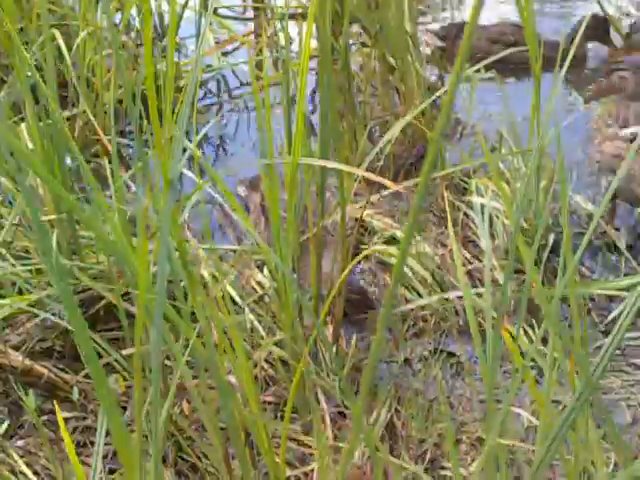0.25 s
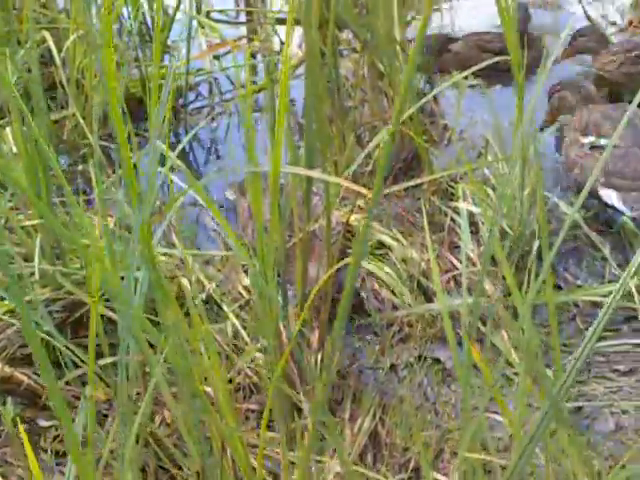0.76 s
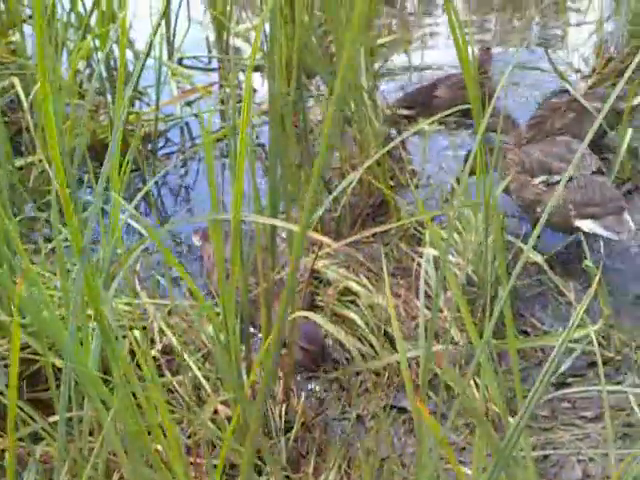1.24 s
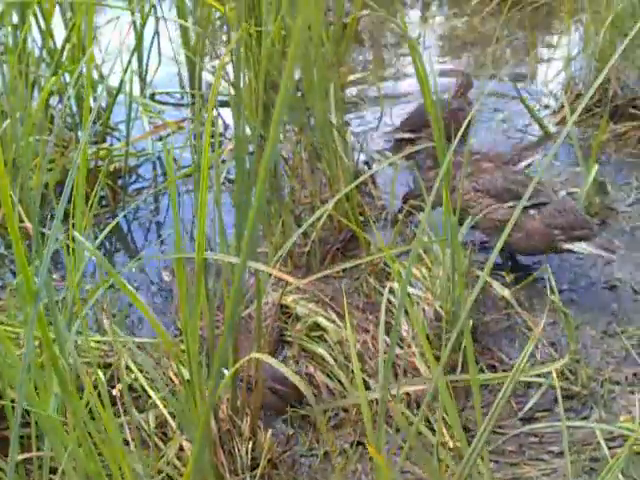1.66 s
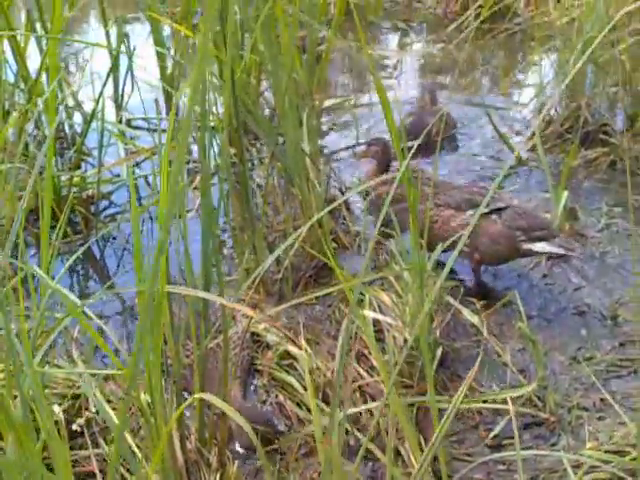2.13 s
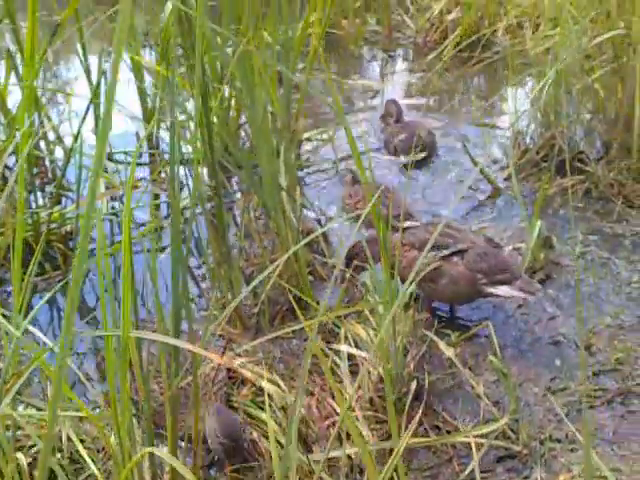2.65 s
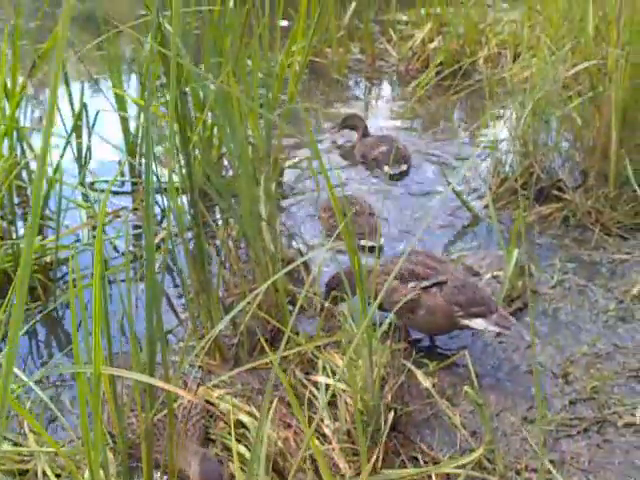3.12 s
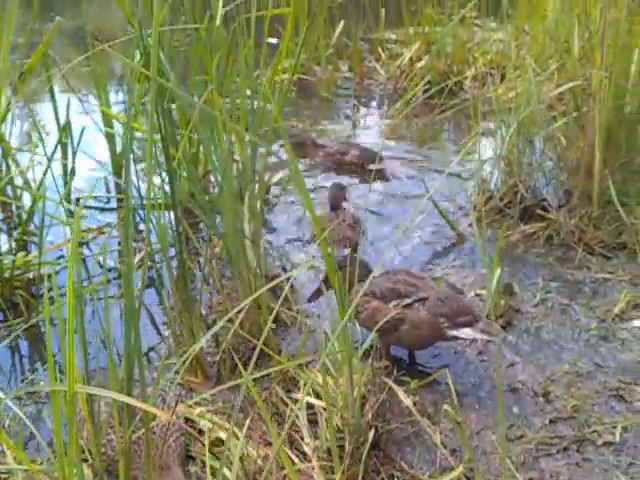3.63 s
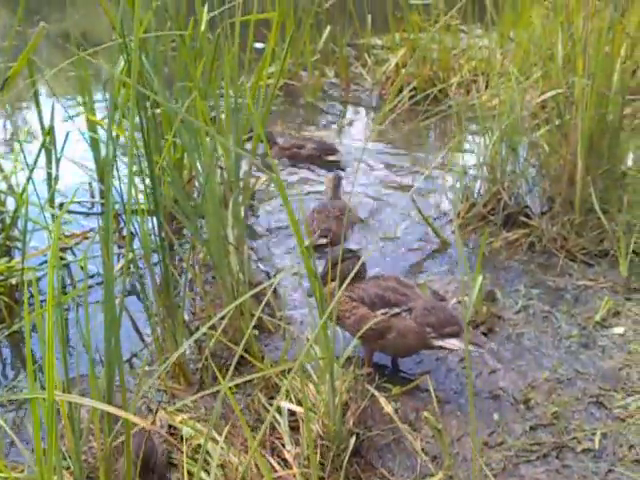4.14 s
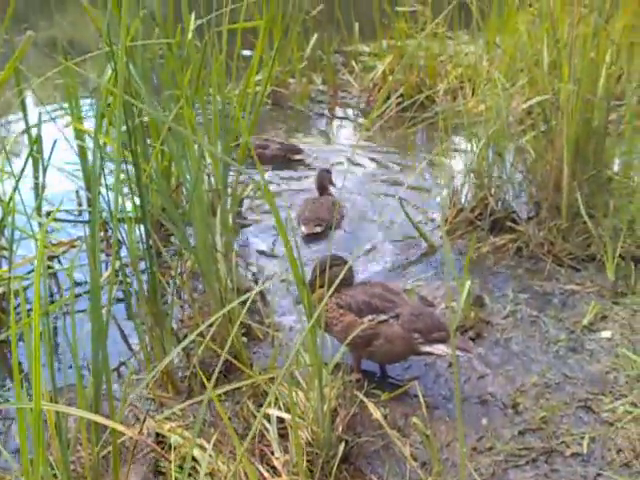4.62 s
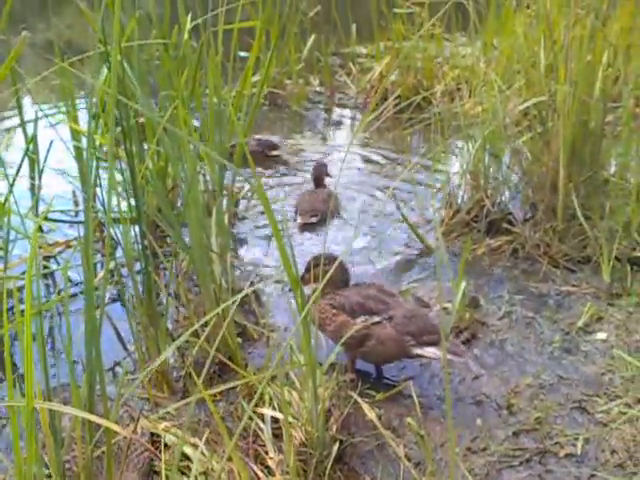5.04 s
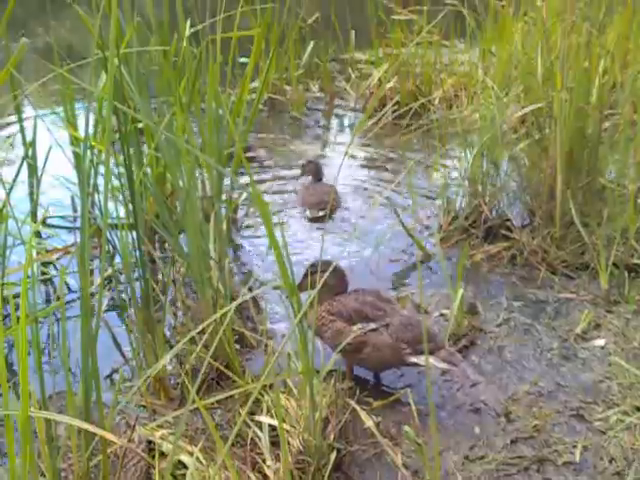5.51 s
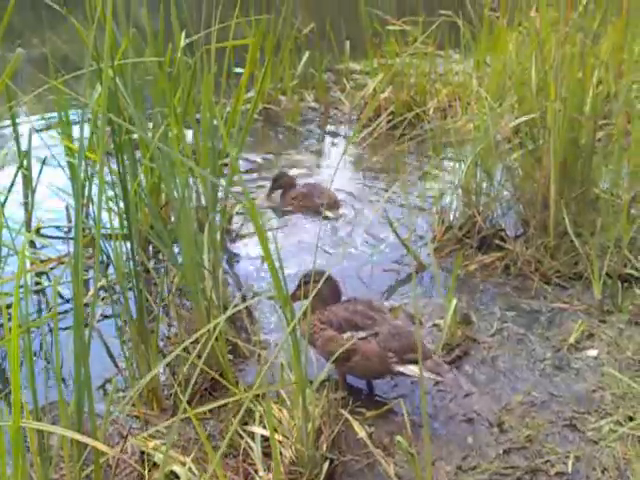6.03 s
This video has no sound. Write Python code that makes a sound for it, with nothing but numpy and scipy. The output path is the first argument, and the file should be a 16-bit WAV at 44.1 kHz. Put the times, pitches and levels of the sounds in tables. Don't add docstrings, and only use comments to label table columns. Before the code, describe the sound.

Duck bills click, nibble and snap in muddy shallows, with watery plops, tiny bubbles, faint young peeps and low wind rumble over soft hiss.

```python
import sys
import numpy as np
from scipy import signal
from scipy.fft import rfft, irfft
from scipy.io import wavfile
from scipy.ndimage import uniform_filter1d

SR = 44100
rng = np.random.default_rng(int(sys.argv[2]) if len(sys.argv) > 2 else 0)


def master(y):
    cut = np.clip(np.atleast_2d(y).T, -1, 1)
    pcm = np.round(cut * 32767)
    wavfile.write(sys.argv[1], SR, pcm.astype(np.int16))


def linear_from_db(decibels):
    return 10 ** (np.asarray(decibels, float) / 20)


N = 276507

# f/Hz, level/dB per Hz
HISS_COLOUR = [(20, -17.5), (60, -9), (130, -9), (270, -16), (550, -21.5), (1000, -20.5), (2000, -23),
               (3900, -24.5), (4700, -29), (8400, -29), (11000, -28.5), (14000, -21.5), (15500, -24)]
# f/Hz, level/dB
BUZZ_COLOUR = [(200, -77), (600, -77.5), (1400, -77), (2400, -84), (3000, -75)]
# f/Hz, level/dB
WHINE = (3999.8, -76)
# t/s, level/dB
GUSTS = [(.11, -38.5), (.41, -52), (.54, -50), (.81, -58), (1.13, -43), (1.33, -56), (1.69, -48),
         (1.99, -51), (2.109, -41.5), (2.21, -45.5), (2.37, -46), (2.84, -48.5), (2.94, -49.5), (3.08, -49),
         (3.19, -45.5), (3.4, -48), (3.52, -45), (3.62, -46), (3.78, -48), (3.87, -41), (4.01, -48),
         (4.08, -43.5), (4.36, -49), (4.47, -49), (4.7, -55), (4.92, -50), (5.07, -47), (5.32, -42.5),
         (5.63, -53.5), (6.16, -49)]
# t/s, length/s, start f/Hz, level/dB
PEEPS = [(.827, .024, 1980, -61), (1.202, 0.018, 2025, -52), (1.51, 0.016, 1990, -50.5),
         (1.522, .024, 1700, -65), (1.528, 0.043, 1976, -49), (1.747, .024, 1746, -56),
         (1.759, 0.053, 1505, -47), (1.959, 0.017, 2050, -58), (1.98, 0.036, 2010, -55),
         (2.248, .016, 2050, -56), (2.269, .054, 2030, -59), (5.192, .03, 2200, -65),
         (5.453, 0.029, 2240, -59), (5.737, .022, 2300, -57), (6.015, 0.021, 2250, -52),
         (6.056, 0.03, 1970, -55)]
# t/s, length/s, start f/Hz, level/dB
CHEEPS = [
    (.226, 0.031, 2170, -64),
    (1.215, 0.032, 1920, -63),
    (.523, 0.065, 2070, -61),
    (2.872, .016, 1500, -48),
    (5.183, 0.031, 2380, -60),
    (5.463, 0.026, 2460, -53),
    (6.031, 0.027, 2470, -52.5),
]
# t/s, length/s, start f/Hz, level/dB
MURMURS = [
    (1.542, 0.016, 2860, -51),
    (2.855, 0.032, 1060, -51),
    (2.92, 0.028, 1175, -51.5),
    (2.953, 0.051, 1095, -53.5),
    (3.74, 0.025, 1100, -49),
    (3.771, 0.043, 1050, -56.5),
    (3.846, 0.029, 1023, -55.5),
]
# start t/s, length/s, level/dB
DABBLES = [
    (.33, 0.076, -65.5),
    (1.416, 0.25, -63.5),
    (2.02, 0.031, -68),
    (2.78, 0.37, -65),
    (3.35, .16, -62.5),
    (3.52, 0.033, -55),
    (3.745, 0.42, -58),
    (4.528, 0.017, -59.5),
    (4.672, 0.021, -64.5),
]
# f/Hz, level/dB
BUBBLE_COLOUR = [(1600, -4.5), (2600, -0.5), (4100, 0.7), (4800, -4.5), (12000, 0)]
# t/s, peak level/dB, f/Hz, ringing/cycles
PLOPS = [(0.483, -57, 1100, 17), (0.908, -53, 1030, 22), (1.255, -46, 1520, 27), (1.433, -40.5, 1210, 20),
         (1.658, -42, 1120, 16), (1.943, -46, 1250, 22), (1.999, -43.5, 1350, 21), (2.375, -45, 1260, 15),
         (2.402, -32.5, 1730, 18), (2.462, -32, 2050, 11), (2.916, -44, 1250, 20), (3.083, -28, 1750, 21.4),
         (3.197, -53, 1180, 18), (3.211, -47, 1590, 18), (3.565, -49, 1080, 36), (3.63, -44, 980, 15),
         (3.679, -44, 1760, 21), (4.26, -39, 2100, 14.3), (4.527, -41, 2470, 20), (4.54, -50, 2300, 18),
         (4.684, -40.5, 2180, 21), (5.8258, -20, 2380, 26)]
# ring f/Hz, knock level/dB against the ring, touches/count
BILLS = [
    (2730, -11, 2),
    (3170, -2.5, 2),
    (3800, 0, 2),
    (3400, 5, 1),
]
# t/s, ring level/dB
LARGE_BILL = [(.706, -41.5), (1.55, -43), (1.7687, -37), (2.4045, -28), (2.745, -41.5), (2.8048, -45.5),
              (2.8812, -46), (2.9221, -40.5), (3.147, -43.5), (3.227, -45), (3.551, -52), (3.628, -46),
              (3.7866, -43), (3.913, -39), (4.058, -39), (4.107, -35.5), (4.1457, -45), (4.1644, -46)]
# t/s, ring level/dB
MIDDLE_BILL = [(.0118, -48), (0.119, -39), (0.1207, -33.5), (1.167, -46), (1.2559, -44.5), (1.6267, -41),
               (1.644, -37), (1.6576, -39), (1.949, -47), (2.4109, -36.5), (2.986, -34.5), (3.398, -48),
               (3.9764, -45), (5.9696, -46.5)]
# t/s, ring level/dB
SMALL_BILL = [
    (0.1937, -44),
    (1.6827, -43.5),
    (3.567, -46),
    (3.679, -51),
    (4.152, -42.5),
    (4.553, -39),
    (4.556, -47),
    (4.63, -48),
    (4.744, -46),
]
# t/s, ring level/dB
TIP_TAPS = [(.163, -51), (1.148, -55), (1.8308, -44), (1.884, -40), (2.165, -51), (2.7362, -44.5),
            (4.045, -48), (4.26, -32.5), (4.347, -50), (4.5907, -46), (4.6857, -37.5), (6.213, -55)]
# t/s, bill ring f/Hz, ring
# level/dB, crack level/dB
CRACKS = [(.0032, 3100, -47, -37.5), (1.3825, 5790, -45, -42), (1.5077, 5790, -63, -41),
          (1.6173, 3450, -43, -45), (1.619, 3120, -38, -29.5), (1.646, 3180, -44, -37),
          (1.9413, 6100, -28, -31), (2.397, 2970, -39, -37), (2.3992, 2700, -37, -33),
          (2.462, 3470, -40.5, -37), (2.4668, 2300, -41, -41), (2.4926, 4500, -37, -33.5),
          (2.865, 3800, -43, -40), (3.0467, 5790, -42, -41), (3.2125, 3630, -39.5, -34.5),
          (3.476, 5790, -58, -38), (3.5557, 2560, -51, -34.5), (3.6312, 3830, -43.5, -41),
          (3.745, 2820, -37.5, -40), (3.747, 5700, -41, -49), (3.8964, 3400, -46, -39),
          (4.1034, 2980, -36, -34), (4.26, 3480, -40, -44), (4.5241, 3920, -41, -40),
          (4.5272, 4050, -37, -27.5), (4.5386, 3300, -35, -42), (4.5418, 4250, -27, -27),
          (4.55, 3300, -42, -39),
          (3.074, 3680, -47, -38),
    (3.0844, 5200, -24, -28),
    (3.0864, 2300, -47, -40),
    (3.0931, 6500, -36, -22.5),
    (3.0955, 4220, -46, -27),
    (5.835, 2330, -45, -38),
    (5.844, 5710, -42, -47),
]
# t/s, spray level/dB
FLICKS = [(0.09, -44), (.2383, -36.5), (0.725, -42), (.3734, -48), (0.935, -39), (1.3828, -35),
          (1.4522, -45), (1.552, -38), (1.5591, -42), (1.621, -30), (1.6909, -38), (1.8809, -41.5),
          (2.3936, -32), (2.4927, -36), (2.8574, -38), (2.9738, -44), (3.0837, -31), (3.0955, -25),
          (3.539, -37), (3.5557, -36), (4.1055, -36), (4.26, -49), (4.535, -32), (4.558, -36),
          (4.6857, -37), (5.838, -46)]
# t/s, peak level/dB, swell before level/dB, crackle after level/dB, crackle decay/s
HARD_SNAPS = [
    (3.0776, -10.5, -37, -19, 0.0019),
    (4.3406, -9.5, -26, -8, .0016),
    (5.8264, -2, -41, -14, 0.00093),
]
# f/Hz, level/dB per Hz
HARD_COLOURS = [
    [(410, -66), (700, -28), (1610, -28), (3310, -2.5), (4250, 2), (5700, -12), (6680, -3.5), (9560, -6),
     (12600, -25), (14400, -8), (15600, -19), (16700, -44)],
    [(410, -48), (700, -19), (1340, 5), (3220, -1), (5190, 0), (5770, 3), (6590, -3), (7230, 1.5),
     (11700, -11.5), (12800, -9), (15000, -7), (16700, -48)],
    [(410, -66), (700, -35), (1700, -38), (2370, -1), (3580, -12), (4370, 0.5), (5260, -11), (8600, -2.5),
     (9430, -6.5), (12500, -3.5), (16000, -12), (16700, -29.5)],
]


def at_hz(points, hz):
    table = np.array(points)
    return np.interp(np.log(hz), np.log(table[:, 0]), table[:, 1])


def rms_one(x):
    return x / np.sqrt(np.mean(x ** 2) + 1e-20)


def band(x, low_hz, high_hz, order=2):
    edges = [low_hz, min(high_hz, .45 * SR)]
    return signal.sosfilt(signal.butter(order, edges, "band", fs=SR, output="sos"), x)


def steep(x, top_hz):
    return signal.sosfilt(signal.ellip(10, .5, 70, top_hz, fs=SR, output="sos"), x)


def drift(rate):
    r = np.exp(-80 * np.pi * rate / SR)
    white = rng.standard_normal(N // 40 + 2002)
    slow = signal.lfilter([1], [1, -2 * r, r * r], white)[2000:]
    return np.interp(np.arange(N) / 40, np.arange(len(slow)), rms_one(slow))


def add(out, s, sound):
    i = round(s * SR)
    out[i:i + len(sound)] += sound[:N - i]


def hiss():
    out, white = 0, rng.standard_normal((2, N))
    edges = np.geomspace(22, 18000, 21)
    together = drift(2.4)
    for k, (low, high) in enumerate(zip(edges, edges[1:])):
        flicker_db = 0.6 * together + 1.24 * drift(18.0)
        level_db = at_hz(HISS_COLOUR, np.sqrt(low * high)) + flicker_db
        out = out + linear_from_db(level_db) * band(white[k % 2], low, high)
    return linear_from_db(-53.5) * rms_one(out)


def buzz():
    t = np.arange(N) / SR
    hz = 199.99 * np.arange(1, 15)[:, None]
    series = linear_from_db(at_hz(BUZZ_COLOUR, hz)) * np.sin(2 * np.pi * (hz * t + rng.random(hz.shape)))
    whine_hz, whine_db = WHINE
    whine = np.sqrt(2) * np.sin(2 * np.pi * whine_hz * t)
    return np.sqrt(2) * series.sum(axis=0) + linear_from_db(whine_db) * whine


def gusts():
    breeze_db, half_width_s = -54, 0.02
    t = np.arange(0, N / SR + .01, .002)
    power = linear_from_db(breeze_db) ** 2
    for s, db in GUSTS:
        power = power + linear_from_db(db) ** 2 * np.exp(-((t - s) / half_width_s) ** 2)
    return np.interp(np.arange(N) / SR, t, np.sqrt(power))


def wind():
    lumps = linear_from_db(1.23 * drift(11.0))
    rumble = band(rng.standard_normal(N), 12.3, 59.0)
    return gusts() * rms_one(lumps * rumble)


def calls():
    kinds = [(PEEPS, .875), (CHEEPS, .76), (MURMURS, 1.05)]
    return [(s, length, hz, hz * end, db)
            for kind, end in kinds for s, length, hz, db in kind]


def peeps():
    out = np.zeros(N)
    for s, length, start_hz, end_hz, db in calls():
        k = np.arange(round(length * 1.11 * SR)) / (length * SR) - .075
        glide = 2 * np.pi * np.cumsum(start_hz + (end_hz - start_hz) * k) / SR
        throb = 1 + .4 * np.cos(2 * np.pi * (70 * k * length + rng.random()))
        shake, breath = rms_one(band(rng.standard_normal((2, len(k))), 30, 340))
        voice = (throb + .22 * breath) * np.sin(glide + .25 * shake)
        add(out, s - 0.077 * length, linear_from_db(db) * np.hanning(len(k)) ** 0.18 * voice)
    return out


def sieving():
    rise_db_per_s, fall_db_per_s = 135, 130
    t = np.arange(N) / SR
    s, length, db = np.transpose(DABBLES)[:, :, None]
    rise_db = rise_db_per_s * np.maximum(s - t, 0)
    fall_db = fall_db_per_s * np.maximum(t - s - length, 0)
    return linear_from_db(db - rise_db - fall_db).max(axis=0)


def ring(clicks, hz, cycles):
    r = linear_from_db(-60 * hz / (max(cycles, 2) * SR))
    w = 2 * np.pi * hz / SR
    return signal.lfilter([0, np.sin(w)], [1, -2 * r * np.cos(w), r * r], clicks + 1e-18)


def dabble():
    sizes = linear_from_db(2.8 * np.minimum(rng.exponential(1, N), 5)) * rng.choice([-1, 1], N)
    born = rng.random(N) < 3200 * linear_from_db(5.5 * drift(45)) / SR
    dealt, out = rng.integers(0, 22, N), 0
    for k, hz in enumerate(np.geomspace(1600, 12000, 22)):
        clicks = sizes * born * (dealt == k)
        out = out + linear_from_db(at_hz(BUBBLE_COLOUR, hz)) * ring(clicks, hz, cycles=26.0)
    return sieving() * linear_from_db(4.0) * rms_one(out)


def plops():
    out, t = np.zeros(N), np.arange(1800) / SR
    for s, db, hz, cycles in PLOPS:
        fade = (1 - np.exp(-t * hz * 0.96)) ** 2 * linear_from_db(-60 * t * hz / max(cycles, 3))
        tone = np.sin(2 * np.pi * hz * t * (1 + 5.1 * t))
        rough = rms_one(band(rng.standard_normal(len(t)), hz / 1.5, hz * 1.5))
        add(out, s, linear_from_db(db + 7) * fade * (tone + 0.4 * rough))
    return out


def nibbles():
    rebound_s, rebound_db = .0036, -4
    crack_db, spray_db = -18, -27
    touched = []
    for (hz, knock_db, touches), bird in zip(BILLS, [LARGE_BILL, MIDDLE_BILL, SMALL_BILL, TIP_TAPS]):
        for s, first_db in bird:
            for again in range(touches):
                db = first_db + again * rebound_db
                touched.append((s + again * rebound_s, hz, db, db + knock_db, db + crack_db, db + spray_db))
    return touched


def cracks():
    knock_db, spray_db = -4, -8
    return [(s, hz, db, db + knock_db, crack_db, crack_db + spray_db)
            for s, hz, db, crack_db in CRACKS]


def flicks():
    ring_hz, ring_db, crack_db = 4500, -15.5, -17
    return [(s, ring_hz, db + ring_db, db + ring_db, db + crack_db, db) for s, db in FLICKS]


def burst(t, sharp_s, tail_s, tail_db):
    shape = np.exp(-t / sharp_s) + linear_from_db(tail_db) * np.exp(-t / tail_s)
    return shape * rng.standard_normal(len(t))


def levelled(x, db):
    return linear_from_db(db) * x / np.sqrt(2 * uniform_filter1d(x ** 2, size=24).max())


def snaps():
    out, t = np.zeros(N), np.arange(700) / SR
    for s, hz, ring_db, knock_db, crack_db, spray_db in nibbles() + cracks() + flicks():
        tear = burst(t, 0.00027, 0.004, tail_db=-12.5)
        bill = band(burst(t, 0.001, 0.01, tail_db=-20.5), hz / 1.118, hz * 1.17)
        knock = levelled(band(tear, 1800, 5500), knock_db)
        crack = levelled(band(tear, 4860, 10800), crack_db)
        spray = levelled(band(tear, 9600, 16300), spray_db)
        add(out, s - .0004, levelled(bill, ring_db) + knock + crack + spray)
    return out


def causal(colour, size):
    hz = np.arange(size // 2 + 1) * SR / size + 1
    cepstrum = irfft(np.log(linear_from_db(at_hz(colour, hz))))
    cepstrum[1:size // 2] *= 2
    cepstrum[size // 2 + 1:] = 0
    return np.exp(rfft(cepstrum))


def hard_snaps():
    out, t = np.zeros(N), np.arange(-120, 904) / SR
    for (s, db, swell_db, crackle_db, crackle_s), colour in zip(HARD_SNAPS, HARD_COLOURS):
        swell = linear_from_db(swell_db) * np.exp(t / 0.0028)
        crackle = linear_from_db(crackle_db) * np.exp(-t / crackle_s)
        shape = np.where(t < 0, swell, crackle)
        force = rfft(shape * rng.standard_normal(len(t)) + (t == 0))
        force = force / np.sqrt(uniform_filter1d(abs(force) ** 2, size=25))
        sound = irfft(force * causal(colour, size=len(t)))
        add(out, s + t[0], linear_from_db(db) * sound / abs(sound).max())
    return out


def scene():
    background = hiss() + buzz() + wind()
    soft = background + peeps() + dabble() + plops() + snaps()
    mono = steep(soft, top_hz=15870) + steep(hard_snaps(), top_hz=16750)
    return np.stack([mono, mono])


def band_limit(x):
    return signal.sosfilt(signal.butter(12, 16840, fs=SR, output="sos"), x)


def record(dry):
    mix = dry + 0.00056
    return band_limit(mix)


dry = scene()
out = record(dry)
master(out)
```